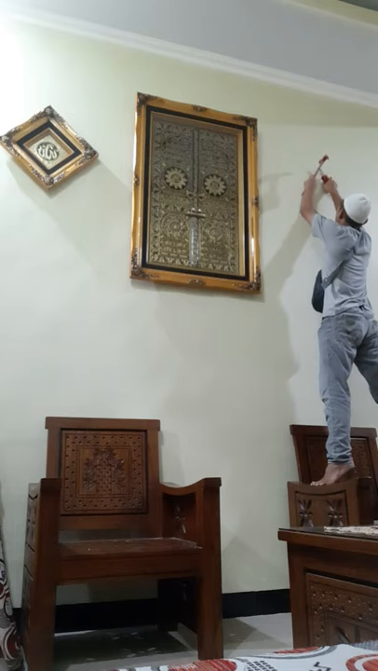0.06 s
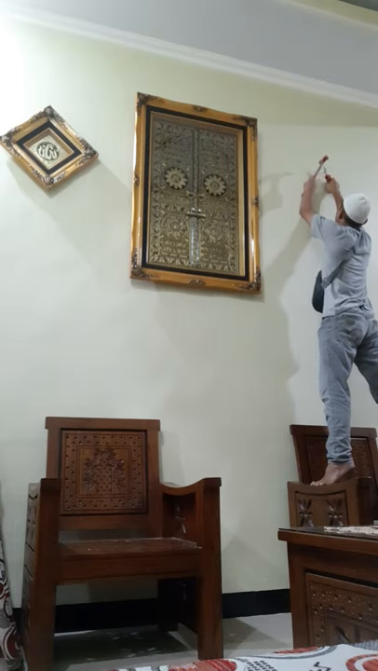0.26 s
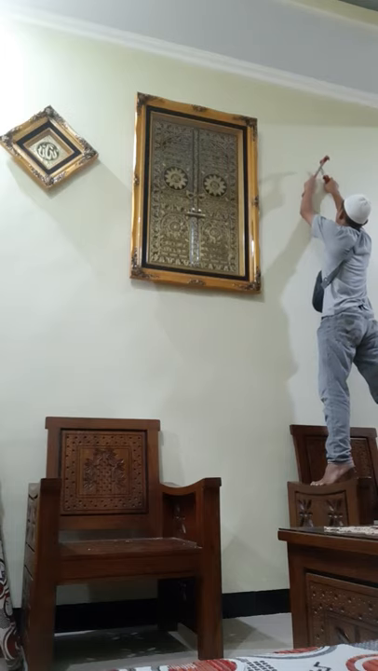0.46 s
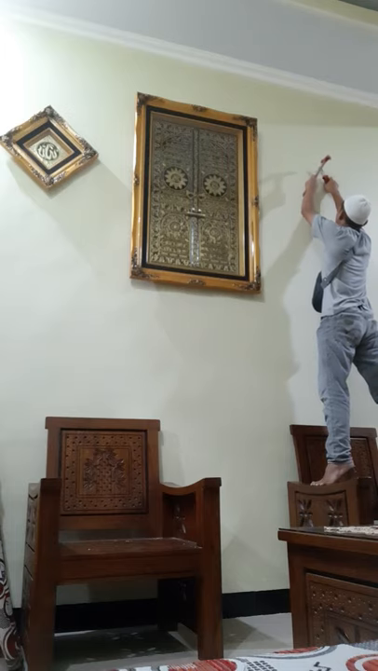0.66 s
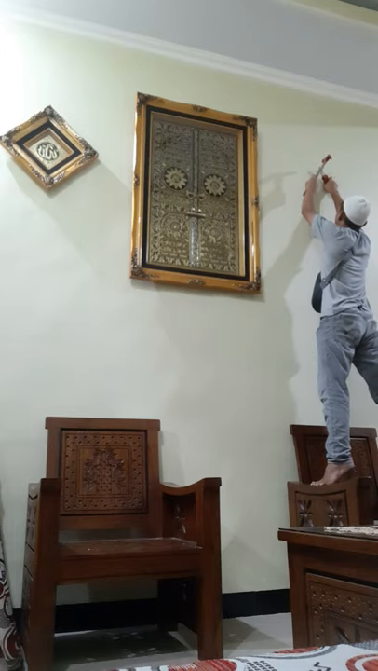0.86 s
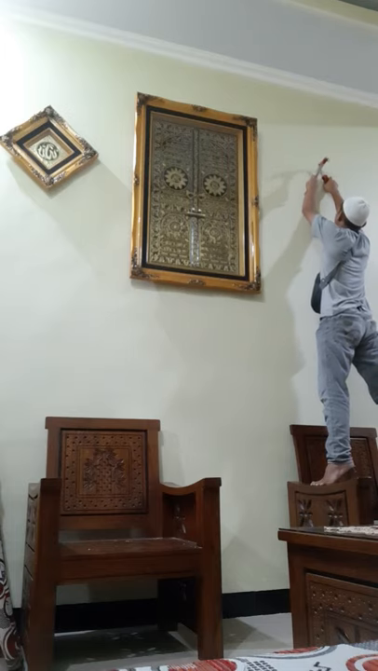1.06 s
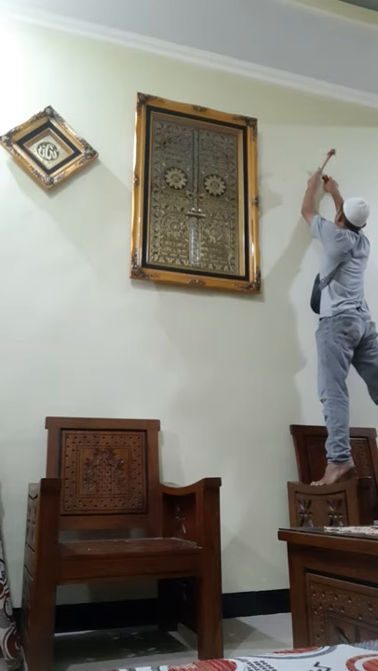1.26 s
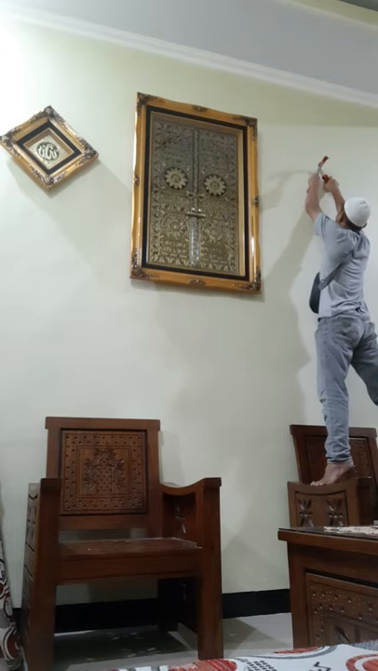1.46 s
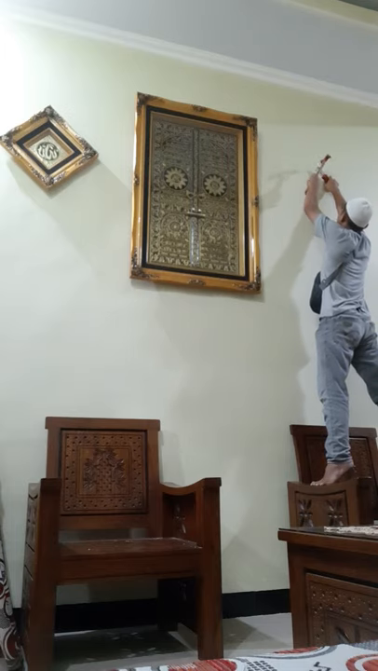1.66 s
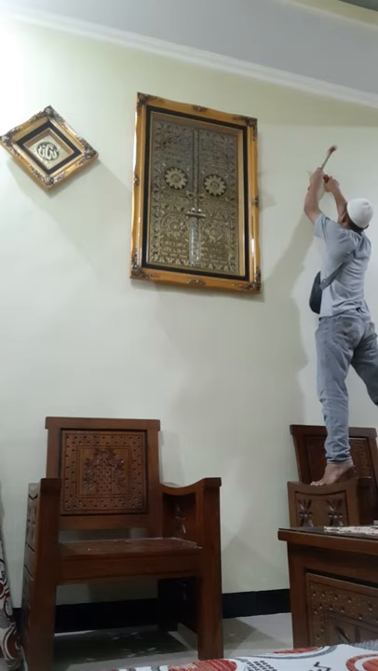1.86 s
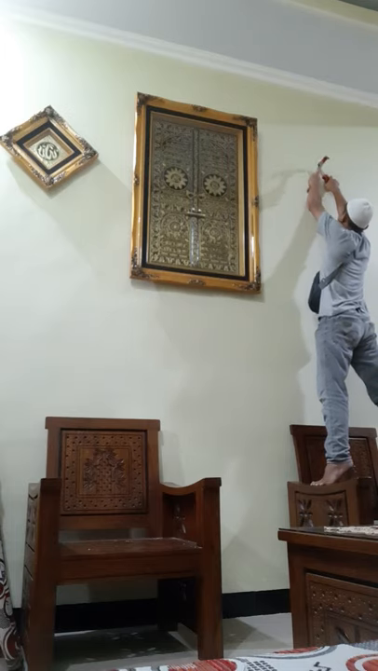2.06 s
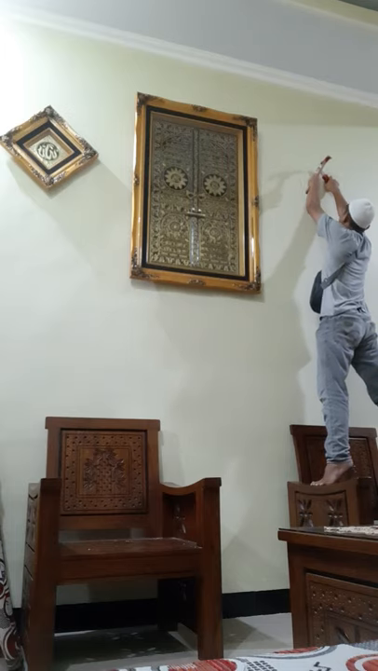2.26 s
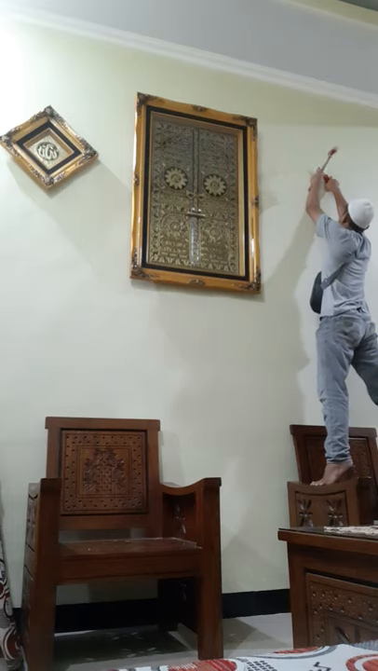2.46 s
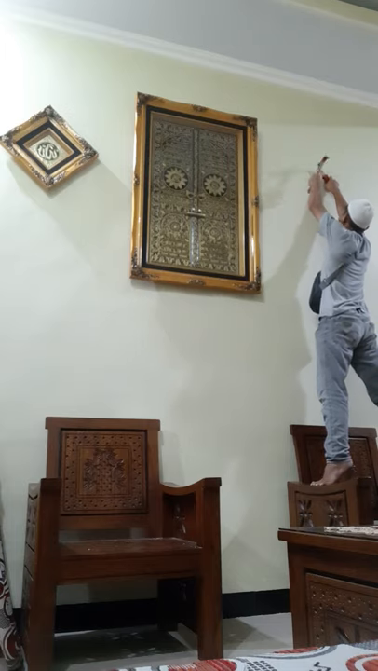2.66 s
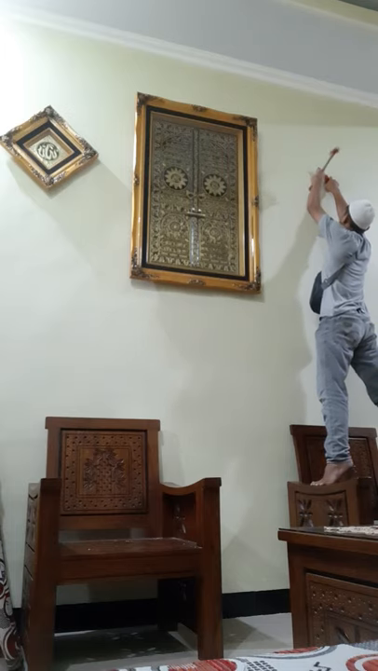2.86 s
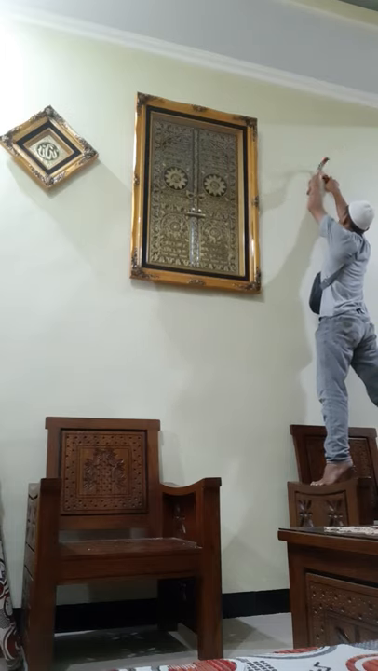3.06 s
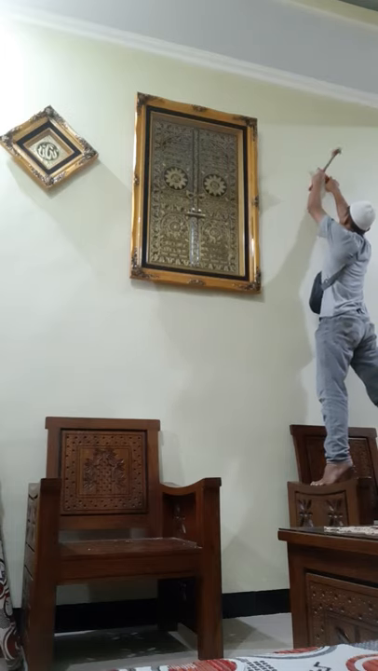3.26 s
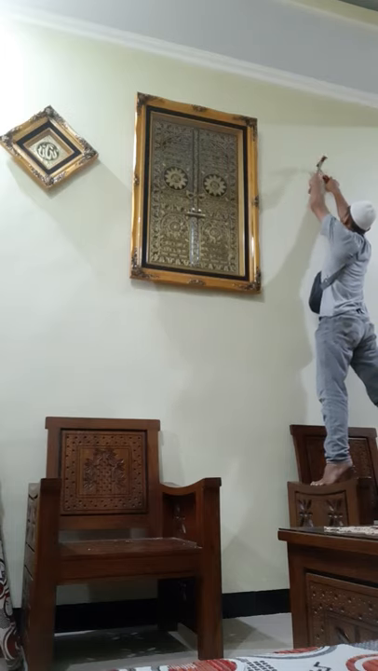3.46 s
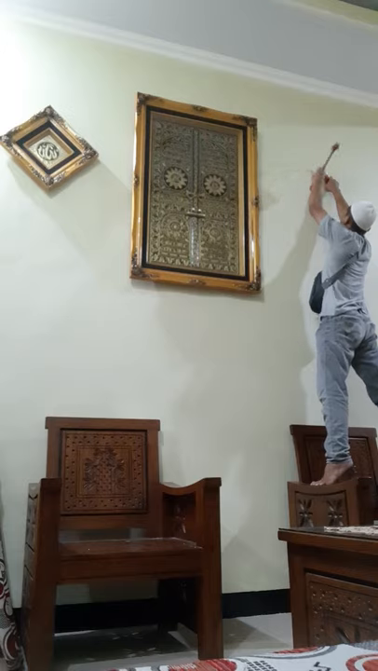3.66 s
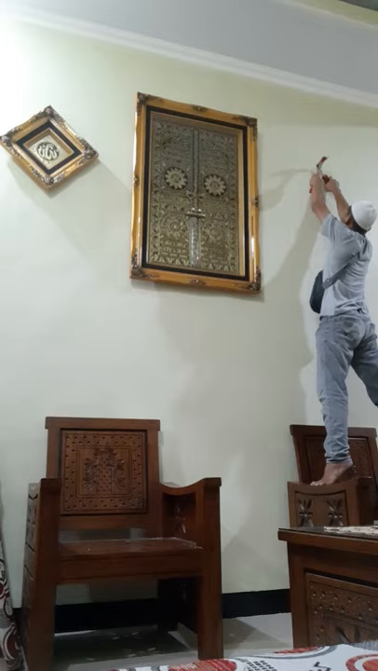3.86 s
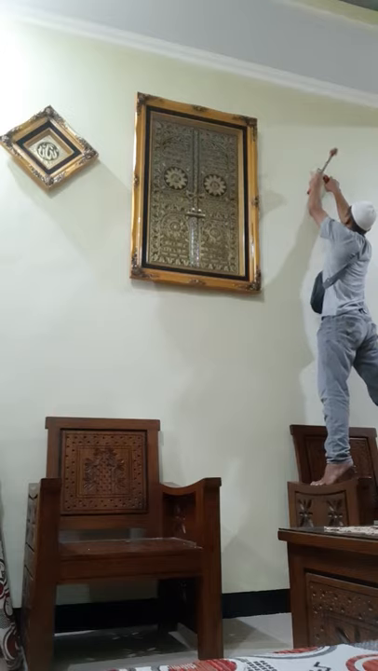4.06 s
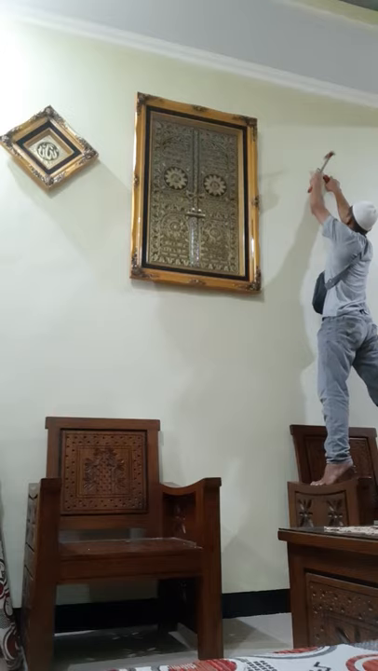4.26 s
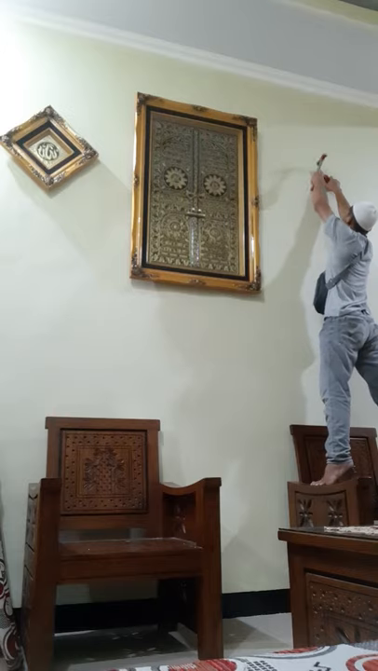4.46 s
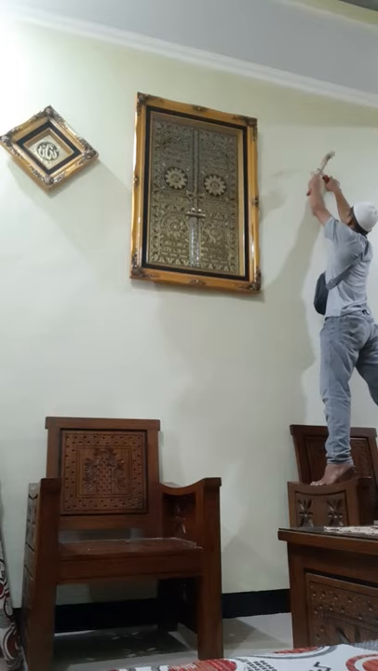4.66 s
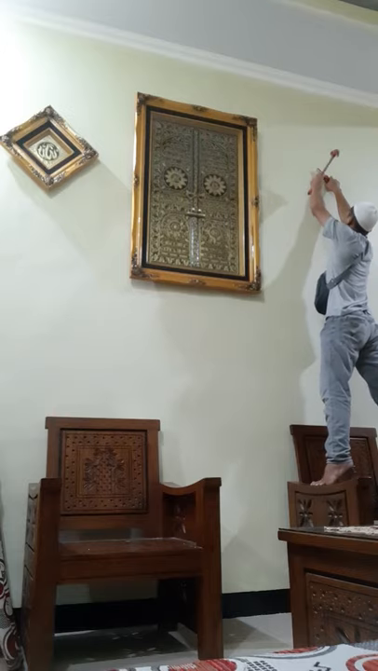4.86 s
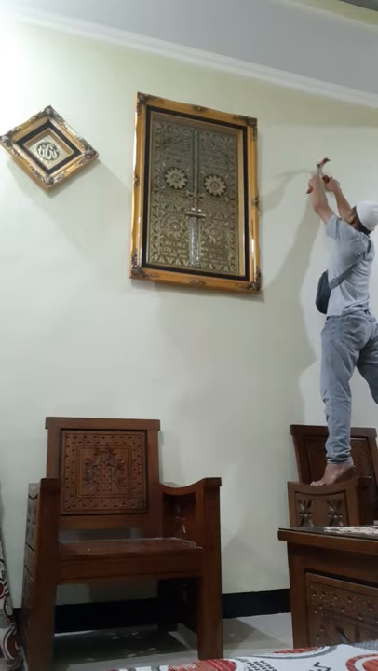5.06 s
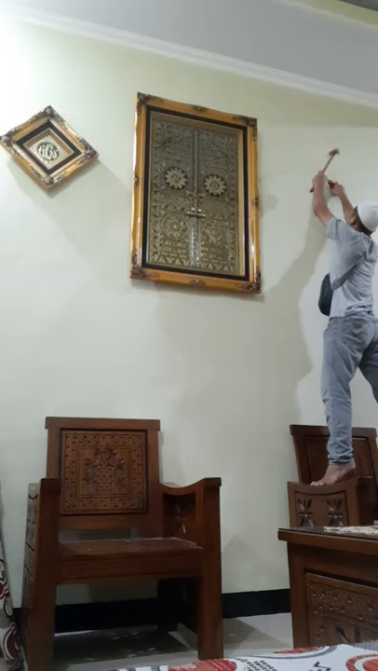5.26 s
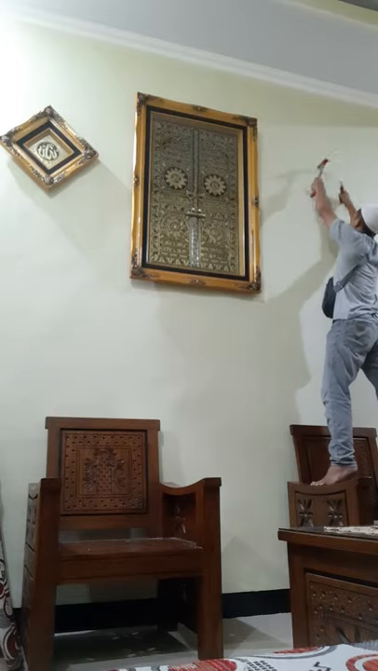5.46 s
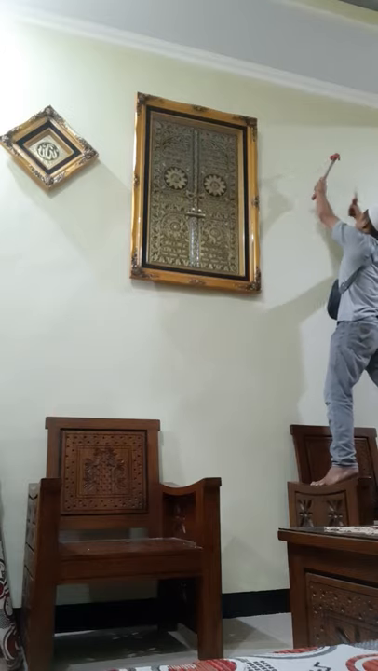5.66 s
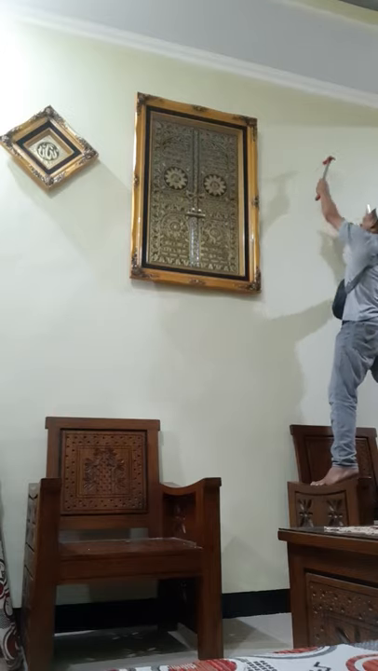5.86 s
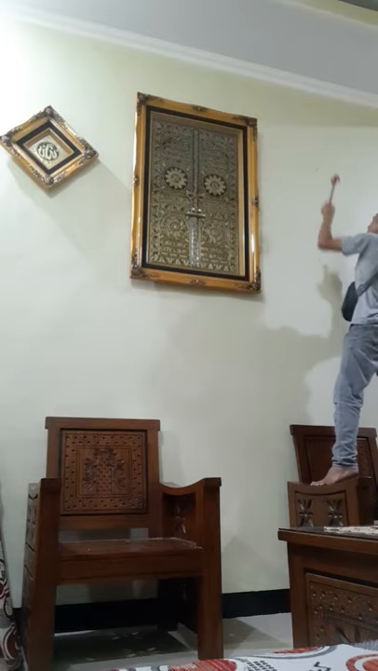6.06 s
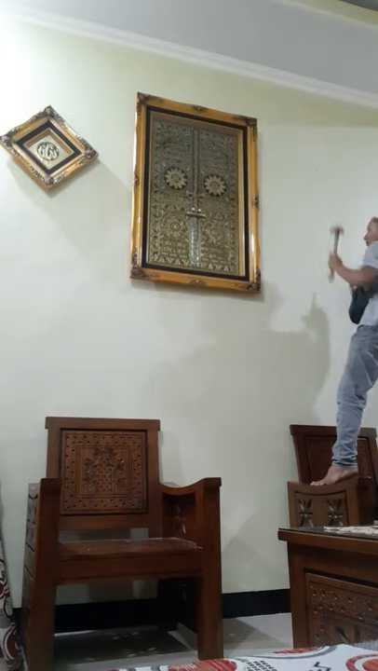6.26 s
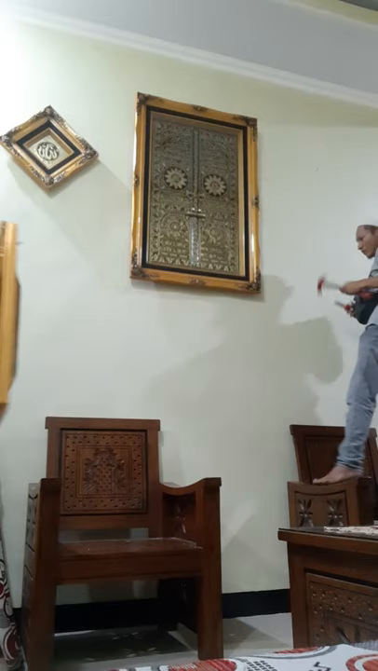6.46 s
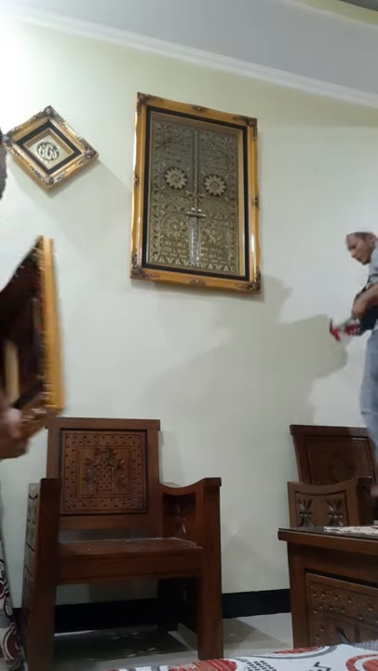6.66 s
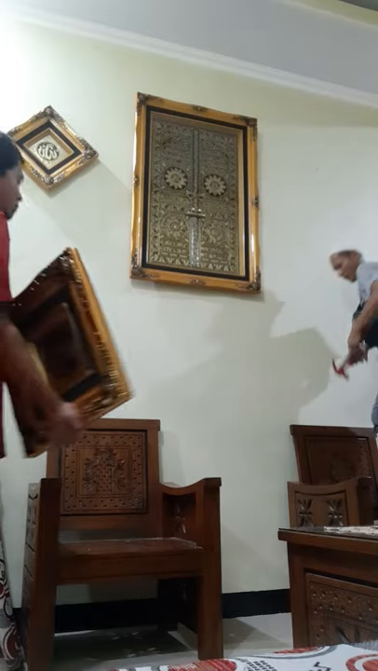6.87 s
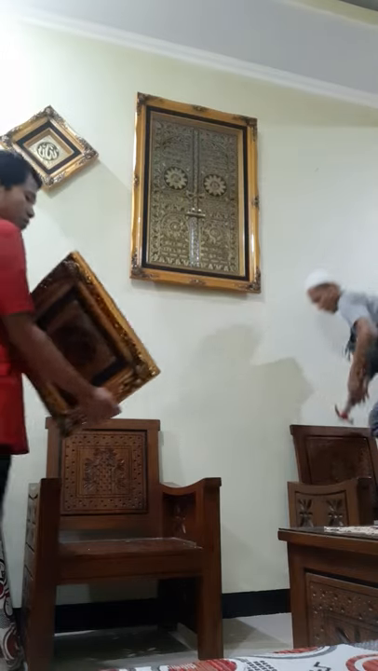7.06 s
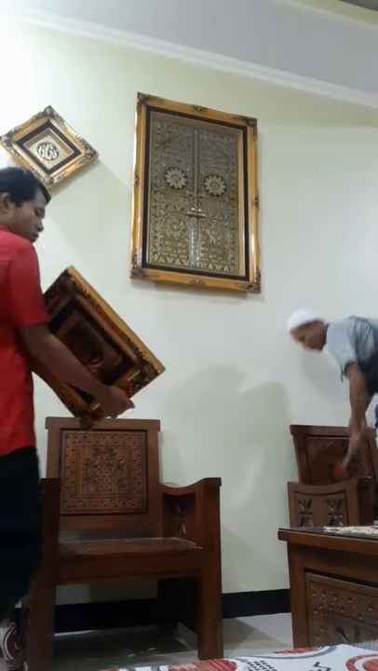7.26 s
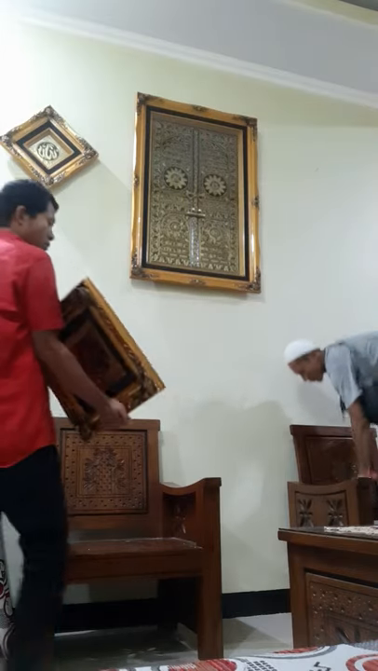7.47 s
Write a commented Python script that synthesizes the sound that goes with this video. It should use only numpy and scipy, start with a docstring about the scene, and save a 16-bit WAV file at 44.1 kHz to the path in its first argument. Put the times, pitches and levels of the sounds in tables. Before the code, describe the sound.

Sharp, metallic hammer blows on a nail ring through a living room, slow at first, then faster, followed by faint shuffling.

```python
"""A hammer drives a nail through plaster into masonry: careful blows and light taps, then a firm run.
Each impact shoves the wall (thud), rocks the nail (knock) and rings steel on steel (crack, tick, ping).
Harder blows are brighter; slanted ones stay longer in contact and sound duller and knockier.
The bare living room answers with echoes and standing waves. Over a low hum, people shift their feet
and their clothes rustle; two microphones a hand apart receive the sound."""
import sys
import numpy as np
from scipy import signal
from scipy.fft import rfft, irfft, next_fast_len
from scipy.io import wavfile
from scipy.ndimage import uniform_filter1d

SR = 44100
rng = np.random.default_rng(int(sys.argv[2]) if len(sys.argv) > 2 else 0)


def materialize(psi):
    """Save the field psi as 16-bit PCM at rate SR to the path in sys.argv[1].

    A 1-D psi becomes a single channel; in a 2-D psi each row is a channel.
    """
    bounded = np.clip(np.atleast_2d(psi).T, -1, 1)
    quanta = np.round(bounded * 32767).astype(np.int16)
    wavfile.write(sys.argv[1], SR, quanta)


N = 330744
SIZE = 65536  # samples in one impulse response
HZ, AGE = np.fft.rfftfreq(SIZE, 1 / SR), np.arange(SIZE) / SR

# Levels in the tables are relative.
# full blows: (time [s], strength [dB], slant [0-1], ping level [dB])
BLOWS = [(1.1081, -23.5, 0.09, -44), (1.4521, -12.5, 0.19, -42.5), (2.11, -13, 0.07, -40),
         (2.7037, -14.5, 0, -40), (3.1206, -14, 0, -40.5), (3.5054, -14.5, 0.09, -40),
         (3.863, -14.5, 0.07, -35), (4.1788, -14.5, 0, -36.5), (4.463, -15, 0.02, -46),
         (4.747, -15, 0.09, -36), (5.008, -15.5, 0.21, -37.5), (5.5169, -17.5, 0.37, -32.5),
         (5.811, -17, 0.26, -37.5)]
# light taps that straighten the nail: (time [s], strength [dB])
TAPS = [(1.801, -21.5), (2.4079, -25.5)]
# radiation of the shoved wall: (frequency [Hz], level [dB])
THUD = [(30, -49.5), (58, -18.5), (85, -15), (115, -14.5), (170, -8), (250, -3), (340, -5), (460, -2.5),
        (560, -2), (720, -4.5), (900, 0), (1250, -4.5), (2600, -11.5), (7000, -19)]
# the nail rocking in its hole: (frequency [Hz], half-width [Hz], level [dB])
KNOCK = [(1290, 160, -0.5), (2460, 330, -10.5), (3650, 200, -15)]
# steel on steel, middle range: (frequency [Hz], level [dB])
CRACK = [(700, -23.5), (1180, -7), (1380, 0.5), (1650, 6), (1980, 2.5), (2150, 0), (2400, -4.5), (2700, 3),
         (3000, -4), (3250, -4.5), (4000, -4.5), (4500, -3.5), (5200, -5.5), (6500, -12), (7500, -12),
         (10500, -38)]
# steel on steel, treble: (frequency [Hz], level [dB])
TICK = [(4000, -10.5), (7500, 6.5), (9600, 0), (12000, 1), (15500, 1.5)]
# the nail's free length, rung off-centre: (frequency [Hz], half-width [Hz], level [dB])
PING = [(4540, 85, 8), (7160, 140, 1.5), (7250, 1160, -1.5)]
# direct path and nearest reflections: (delay [s], gain [ratio], best-carried frequency [Hz])
PATHS = [(.0007, 0.29, 3900), (.0036, 0.41, 2050), (.0072, 0.25, 690), (0.017, 0.42, 13780),
         (0.018, .16, 7100), (.0225, 0.22, 12100), (.027, 0.16, 386)]
# low modes of wall and room: (frequency [Hz], level [dB], 60 dB decay time [s])
MODES = [(85.6, -17, 1.3), (141, -14.5, 1.1), (209.1, -14, 0.41), (254.8, -9.5, 0.61), (309.4, -17.5, 0.86),
         (337.5, -6, 0.27), (357, -17, 0.63), (410.2, -14, 0.36), (550, -21, 0.38), (576, -19, 1.2),
         (623, -14.5, 0.89), (661, -19.5, 0.48), (713.5, -10, 0.37), (751, -21, 0.78), (797, -29, 0.72),
         (975, -28, 0.34), (1320, -30.5, 0.39)]
# reverberation of the room: (frequency [Hz], 60 dB decay time [s])
REVERB_TIME = [(80, 1), (200, 0.6), (560, 0.72), (1500, 0.59), (4000, 0.59), (7500, 0.55), (11000, 0.45),
               (16000, 0.37)]
# first echoes, relative to the even decay: (frequency [Hz], level [dB])
NEAR_ECHO = [(100, -20), (280, -35), (550, 1), (1000, 10.5), (1800, 13.5), (4000, -0.5), (8000, 5.5),
             (14000, -5.5)]
# echo off the far walls, relative to the even decay: (frequency [Hz], level [dB])
FAR_ECHO = [(100, 12), (170, -4.5), (280, 9), (600, 6), (1200, -1.5), (4000, 4), (12000, 2.5)]
# left microphone minus right: (frequency [Hz], level [dB])
BALANCE = [(60, 2), (200, 1.5), (340, -2.5), (500, -2), (750, 0.5), (1100, 8), (1800, 9.5), (2800, 2),
           (4200, 4), (6400, 4), (9000, 13.5), (15000, 9)]
# soft footfalls: (time [s], level [dB], centre frequency [Hz])
STEPS = [(0.071, -47, 94.5), (.16, -52, 85), (0.526, -50.5, 96.5), (0.649, -49.5, 91.5),
         (6.225, -50, 237.4), (6.3, -47.5, 88.7), (6.515, -53, 395), (6.551, -60, 159), (6.961, -50.5, 160),
         (7.319, -60, 307)]
# people's movement before and after the hammering: (time [s], level [dB])
STIR = [(0.0, -51.5), (0.278, -52.5), (0.388, -57), (0.544, -54.5), (0.604, -58.5), (1.04, -64.5),
        (1.08, -58), (6.4, -57.5), (6.562, -61.5), (6.61, -62.5), (6.914, -59), (7.028, -57),
        (7.084, -59), (7.48, -53.5)]
# shuffling feet: (frequency [Hz], level [dB])
SHUFFLE = [(40, -35), (90, 0), (250, 4), (450, 0), (800, -8), (1500, -18.5), (3000, -50)]
# rustling clothes: (frequency [Hz], level [dB])
CLOTH = [(100, -18.5), (500, 4), (1100, 10), (1800, 6), (3000, -1), (5000, -1), (7500, -9), (9500, -23),
         (12000, -11.5), (16000, -25)]
# single swishes of clothing: (peak time [s], level [dB])
SWISHES = [(.01, -61.5), (.15, -58), (1.08, -61), (1.3, -51.5), (7.045, -52.5), (7.35, -54.5)]
# hum of the quiet room: (frequency [Hz], spectral level [dB])
HUM = [(18, -58), (30, -37), (90, -0.5), (134, -6), (210, -12.5), (287, -19.5), (404, -16.5), (702, -27.5),
       (1010, -25), (1130, -29.5), (5900, -48.5), (6550, -38.5), (16000, -59.5)]


def hammering(response, level_db=36, drift=0.42, drift_hz=2500):
    """Decorrelation: as arm and body move, short waves find new paths; long ones meet the same room."""
    out = np.zeros((2, N))
    other_echoes = [echoes() * microphone_balance() for _ in range(3)]
    change = drift * HZ / (HZ + drift_hz)
    for s, *stroke in strokes():
        weights = rng.standard_normal(len(other_echoes))
        new_paths = np.tensordot(weights / np.linalg.norm(weights), other_echoes, 1)
        transfer = np.sqrt(1 - change ** 2) * response + change * new_paths
        add(out, s, gain_of(level_db) * waveform(transfer * impact(s, *stroke)))
    return out


def strokes(square_ms=1.117, slant_ms=1.02, tap_ms=0.73, tap_slant=0.28, tap_ping_db=-62):
    """Contact time: a square blow rebounds quickly, a slanted one stays on the nail longer."""
    blows = [(s, db, slant, square_ms + slant_ms * slant, ping_db) for s, db, slant, ping_db in BLOWS]
    taps = [(s, db, tap_slant, tap_ms, tap_ping_db) for s, db in TAPS]
    return sorted(blows + taps)


def impact(s, strength_db, slant, contact_ms, ping_db, ripple_hz=300):
    """Impact excitation: the spectra of a half-sine shove, the nail and the steel add in power."""
    force = np.sin(np.pi * np.minimum(AGE * 1000 / contact_ms, 1))
    thud = evened(abs(rfft(force)) * gain_of(read(THUD, HZ)))
    # the face never lands on quite the same spot, so the steel's colour shifts
    ripple_db = 1.4 * np.interp(HZ / ripple_hz, np.arange(100), rng.standard_normal(100))
    crack = evened(gain_of(read(CRACK, HZ) + ripple_db))
    tick = evened(gain_of(read(TICK, HZ) + ripple_db))
    # until about 1.65 s the tip sits in soft plaster, which swallows the crack and adds a little grit
    plaster = 0.5 - 0.5 * np.tanh((s - 1.65) / 0.5)
    above_firm_db = strength_db + 14  # a firm blow has strength -14 dB
    crack_db = -21.5 + 1.56 * above_firm_db - 14.5 * plaster
    tick_db = -36.5 + 1.55 * above_firm_db + 2 * plaster
    parts = np.array([thud, slant * resonances(KNOCK), crack, tick, resonances(PING)])
    levels = gain_of([strength_db, strength_db, crack_db, tick_db, ping_db])
    return minimum_phase(np.linalg.norm(levels[:, None] * parts, axis=0))


def resonances(table):
    """Resonance: the nail's bell-shaped peaks add in power to a gain curve of rms 1."""
    peaks = [gain_of(db) / (1 + ((HZ - hz) / width) ** 2) for hz, width, db in table]
    return evened(np.linalg.norm(peaks, axis=0))


def room():
    """Superposition: early paths, dense echoes and modes sum to the room's transfer function."""
    dense = echoes()
    return (dense + early_paths() + standing_waves(dense)) * microphone_balance()


def early_paths(octaves=1.25):
    """Multipath propagation: each path delays the sound and favours one band."""
    paths = 0
    for s, gain, hz in PATHS:
        band = 1 / (1 + (np.log2((HZ + 1) / hz) / octaves) ** 2)
        paths += gain * np.exp(-2j * np.pi * HZ * s) * minimum_phase(band)
    return np.array([paths, paths * crossfeed(HZ)])


def standing_waves(dense, level_db=-20, swell_s=0.0068):
    """Normal modes build up in phase with the echoes that feed them, then decay exponentially."""
    ring = np.zeros(SIZE)
    for hz, db, t60 in MODES:
        phase = np.angle(dense[:, round(hz / HZ[1])].sum())
        envelope = np.exp(-np.log(1000) * AGE / t60) * (1 - np.exp(-AGE / swell_s))
        mode = np.cos(2 * np.pi * hz * AGE + phase) * envelope
        ring += gain_of(db + level_db) * mode / np.linalg.norm(mode)
    return rfft(ring)


def echoes(near_s=0.0088, far_s=0.026, far_width_s=0.008, build_cycles=0.7, smooth_hz=55):
    """Reverberation: dense echoes start strongly, swell off the far walls, then decay evenly."""
    noise = diffuse_field(SIZE)[1]
    centres = np.geomspace(70, 16000, num=12)
    near = np.exp(-AGE / near_s)
    far = np.exp(-((AGE - far_s) / far_width_s) ** 2)
    tail = np.zeros((2, SIZE))
    for hz, share in zip(centres, np.eye(len(centres))):
        band = irfft(noise * read(np.c_[centres, share], HZ))
        emphasis = gain_of(read(NEAR_ECHO, hz) * near + read(FAR_ECHO, hz) * far)
        decay = np.exp(-np.log(1000) * AGE / read(REVERB_TIME, hz))
        build_up = 1 - np.exp(-AGE * hz / build_cycles)
        envelope = emphasis * decay * build_up
        tail += band * envelope / np.linalg.norm(envelope)
    # the echoes carry equal power in every band
    spectrum = rfft(tail)
    power = abs(spectrum) ** 2
    for _ in range(2):
        power = uniform_filter1d(power, int(smooth_hz / HZ[1]), axis=1)
    return spectrum * np.array([minimum_phase(1 / np.sqrt(abs(p) + 1e-9)) for p in power])


def footfalls(response, level_db=32, octaves=0.6):
    """Soft impact: bare feet bump wood and floor, exciting the room with dull, low pulses."""
    out = np.zeros((2, N))
    for s, db, hz in STEPS:
        bump = evened(np.exp(-abs(np.log2((HZ + 1) / hz) / octaves) ** 1.5))
        add(out, s, gain_of(db + level_db) * waveform(response * minimum_phase(bump)))
    return out


def shuffle_and_rustle(usual_db=-56, rise_s=0.069, fall_s=0.09):
    """Friction noise: feet and clothes follow people's movement, with a few quick swishes."""
    t = np.arange(N) / SR
    stir_db = np.interp(t, *np.transpose(STIR)) - usual_db
    swishes = sum(gain_of(db) * np.exp(-np.maximum((s - t) / rise_s, (t - s) / fall_s))
                  for s, db in SWISHES)
    shuffle = diffuse_noise(SHUFFLE) * gain_of(-52 + stir_db)
    cloth = diffuse_noise(CLOTH) * np.hypot(gain_of(-62 + 0.94 * stir_db), swishes)
    return shuffle * lean_left(db=1) + cloth * lean_left(db=2)


def hum(level_db=-53.5):
    """Stationary noise: the quiet room has its power mostly at low frequencies."""
    return gain_of(level_db) * diffuse_noise(HUM) * lean_left(db=1)


def diffuse_noise(colour):
    """Spectral shaping: a diffuse field takes on a given colour, at rms 1."""
    hz, noise = diffuse_field(2 * next_fast_len(N // 2 + 1))
    return evened(irfft(noise * gain_of(read(colour, hz)))[:, :N])


def diffuse_field(size, spacing_s=0.00045, crossfeed_share=0.26):
    """Spatial coherence: noise from all sides is alike at both microphones only for long waves."""
    hz = np.fft.rfftfreq(size, 1 / SR)
    left, independent = rfft(rng.standard_normal((2, size)))
    all_round = np.sinc(2 * hz * spacing_s)  # spacing is the travel time between the microphones
    coherence = all_round + crossfeed_share * (1 - abs(all_round)) * crossfeed(hz)
    right = coherence * left + np.sqrt(abs(1 - abs(coherence) ** 2)) * independent
    return hz, np.array([left, right])


def crossfeed(hz, delay_s=0.00047):
    """Stereo cross-feed: the right channel carries a delayed copy of the left, in all sounds alike."""
    return np.exp(-2j * np.pi * hz * delay_s)


def microphone_balance():
    """Constant-power panning: sound from the hammer's corner divides between the microphones."""
    gains = gain_of(read(BALANCE, HZ) * np.array([[0.5], [-0.5]]))
    gains /= np.sqrt(np.mean(gains ** 2, axis=0))
    return np.array([minimum_phase(gain) for gain in gains])


def lean_left(db):
    """Level panning: the left channel rises by db and the right falls by as much."""
    return gain_of([[db], [-db]])


def minimum_phase(gain):
    """Minimum phase: the spectrum of the promptest causal pulse that has these gains."""
    log_gain = np.log(np.maximum(gain, gain.max() * 1e-5))
    mirrored = np.concatenate([log_gain, log_gain[-2:0:-1]])
    return np.exp(np.conj(signal.hilbert(mirrored)))[:len(gain)]


def waveform(spectrum, end_s=1.3):
    """Fourier synthesis: a spectrum becomes a sound, faded out by end_s."""
    return irfft(spectrum) * np.clip(4 - 4 * AGE / end_s, 0, 1)


def gain_of(db):
    """Decibel law: 20 dB is a factor of ten in amplitude."""
    return 10 ** (np.asarray(db) / 20)


def evened(x):
    """Normalisation to rms 1."""
    return x / np.sqrt(np.mean(abs(x) ** 2) + 1e-20)


def read(points, hz):
    """Interpolation of (frequency [Hz], value) points on a logarithmic frequency axis."""
    frequency, value = np.transpose(points)
    return np.interp(np.log(hz + 1), np.log(frequency + 1), value)


def add(mix, s, sound):
    """Superposition of a stereo sound on the mix at time s."""
    part = mix[:, round(s * SR):][:, :sound.shape[1]]
    part += sound[:, :part.shape[1]]


def scene():
    """Linear superposition: the pressures of hammer, feet, clothes and hum add in one room."""
    response = room()
    return hammering(response) + footfalls(response) + shuffle_and_rustle() + hum()


def record(dry, cutoff_hz=15950):
    """Soft saturation rounds the loudest peaks at full scale; a low-pass filter limits the band."""
    rounded = dry / (1 + dry ** 8) ** (1 / 8)
    low_pass = signal.firwin(511, cutoff_hz, window=("kaiser", 9), fs=SR)
    return signal.oaconvolve(rounded, low_pass[None], "same")


dry = scene()
out = record(dry)
materialize(out)
```